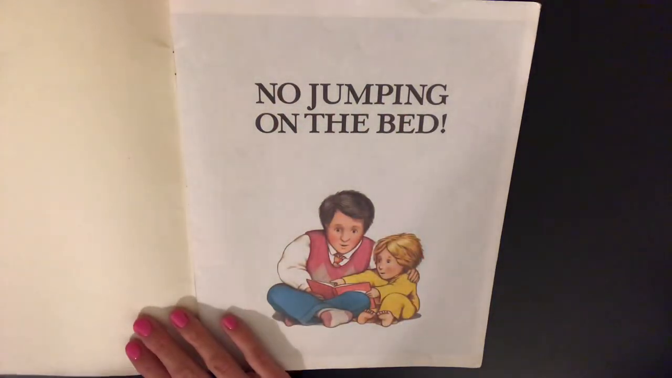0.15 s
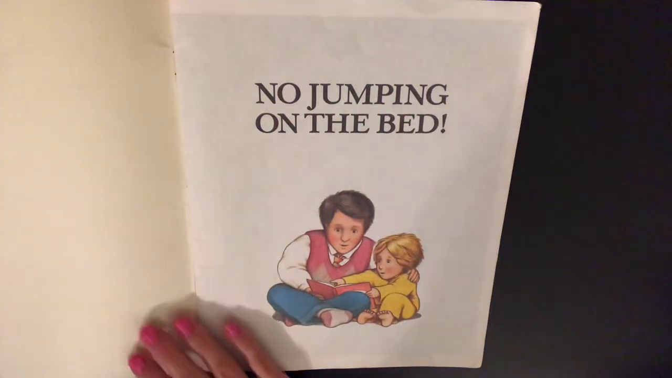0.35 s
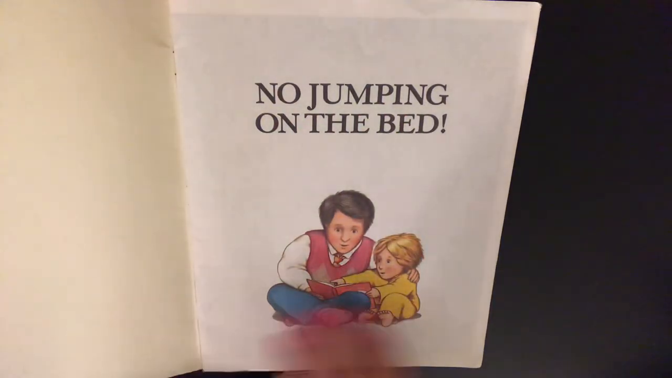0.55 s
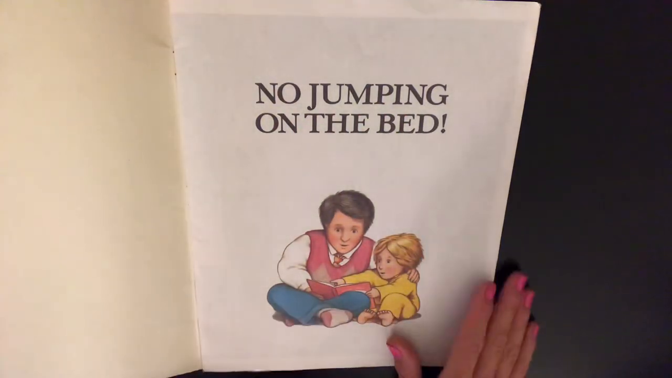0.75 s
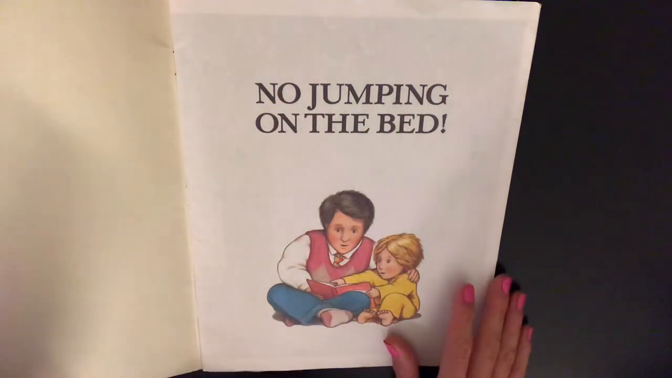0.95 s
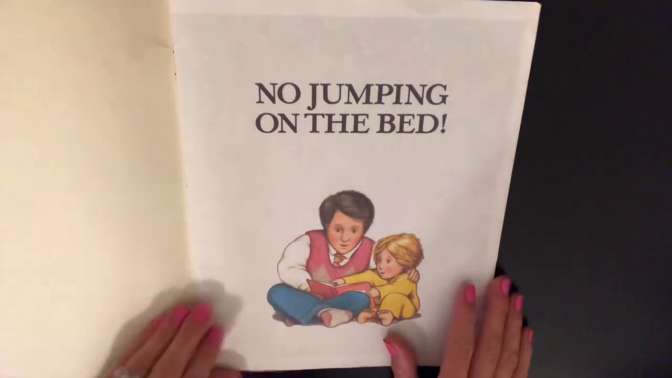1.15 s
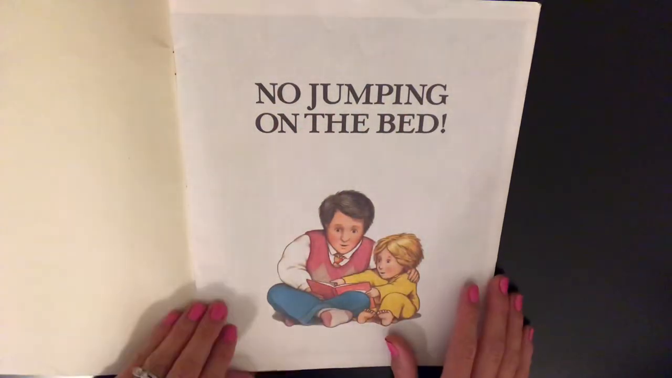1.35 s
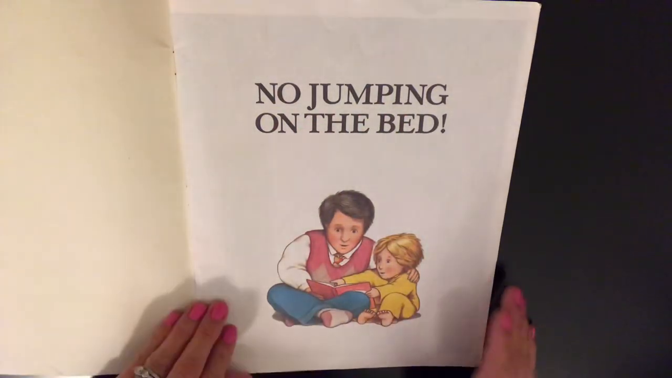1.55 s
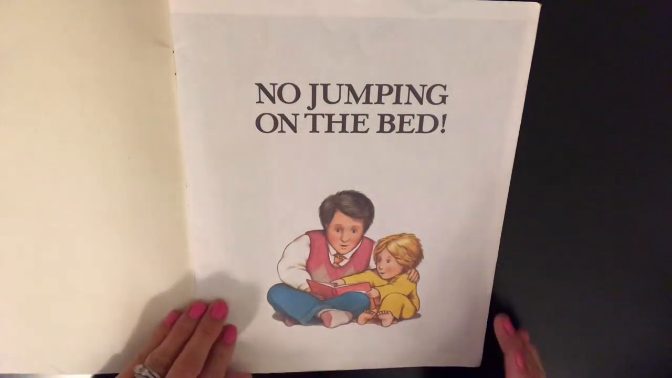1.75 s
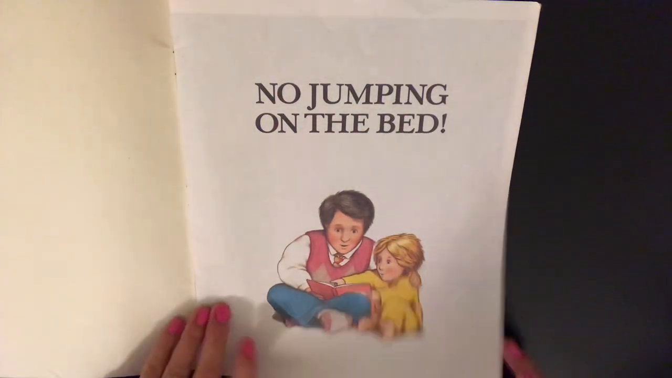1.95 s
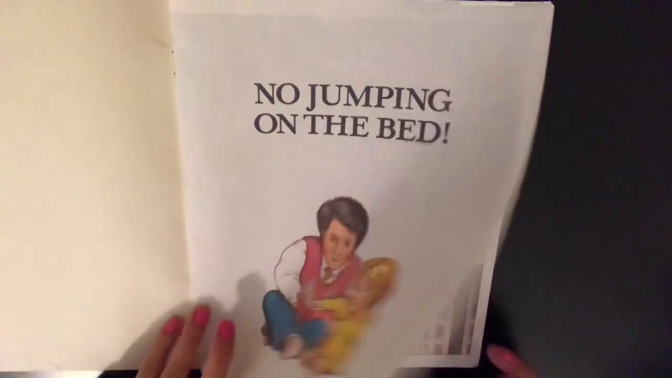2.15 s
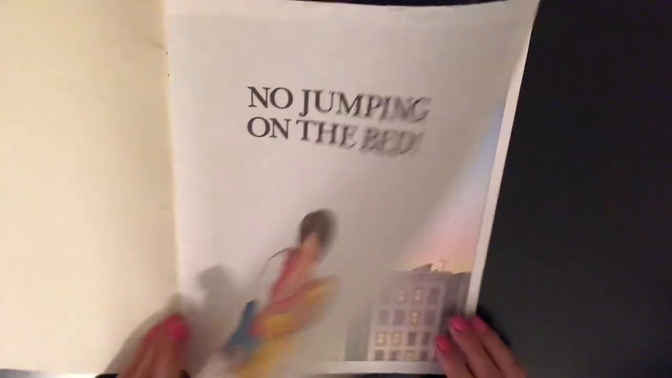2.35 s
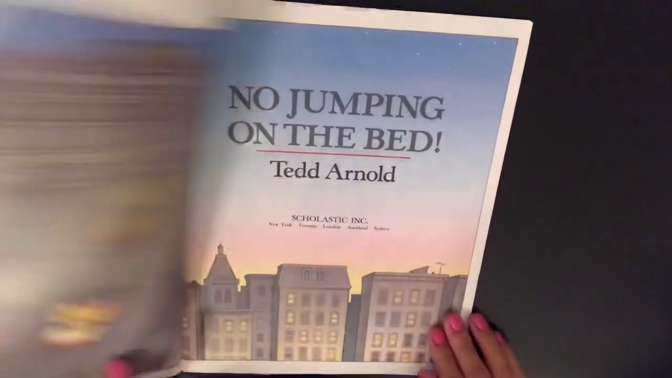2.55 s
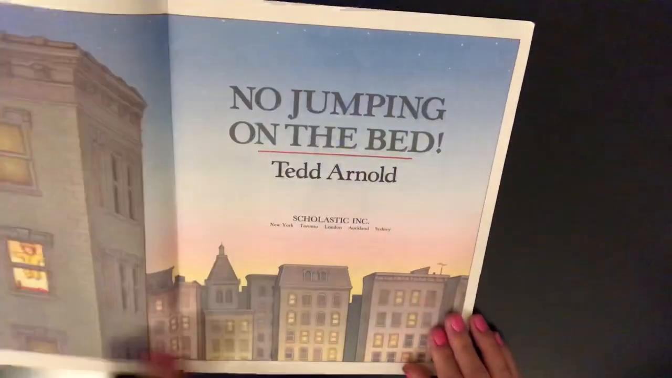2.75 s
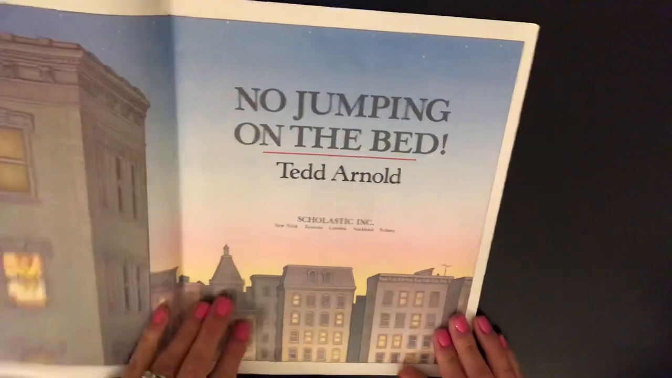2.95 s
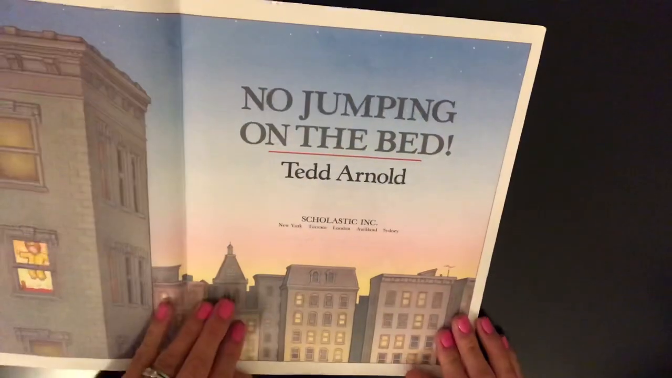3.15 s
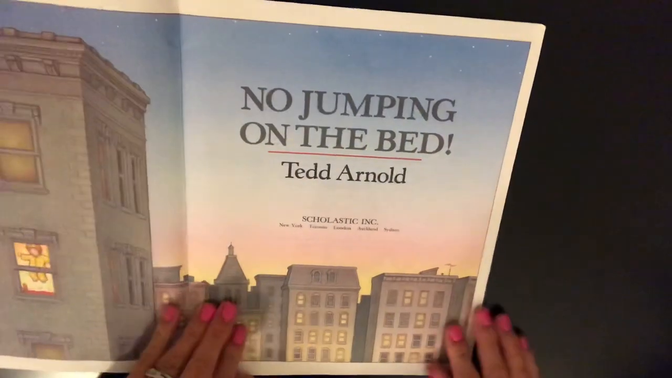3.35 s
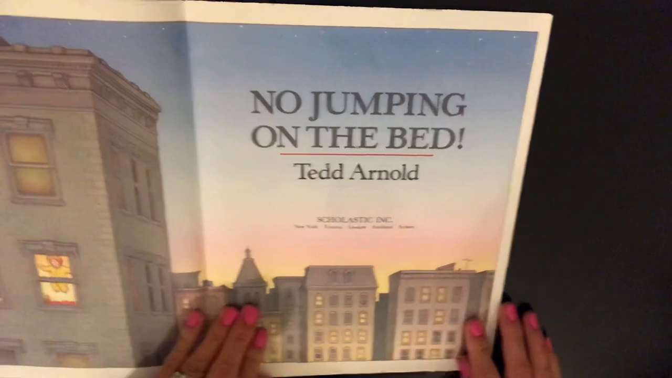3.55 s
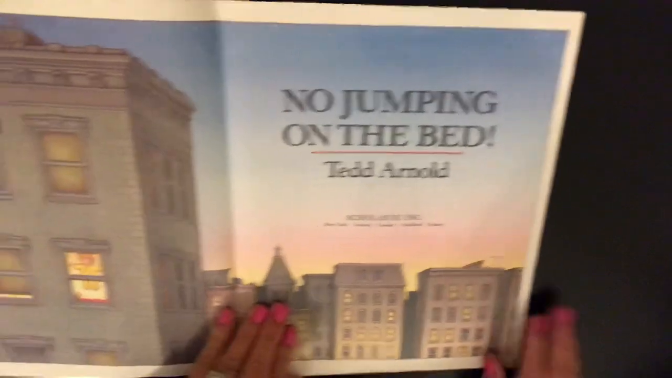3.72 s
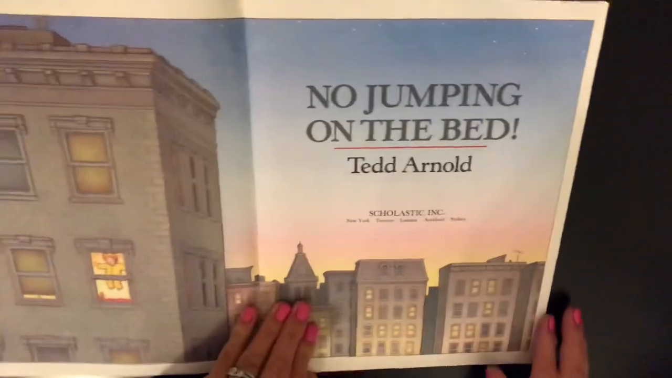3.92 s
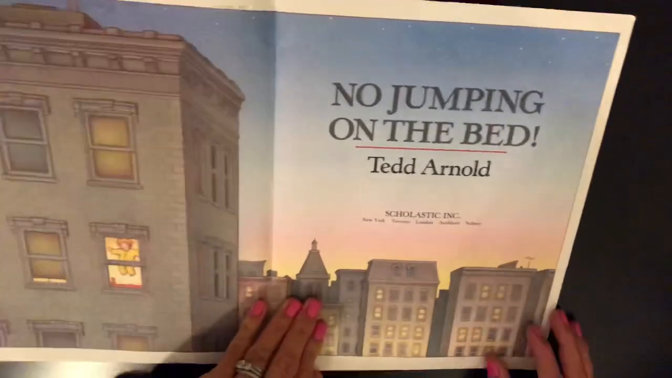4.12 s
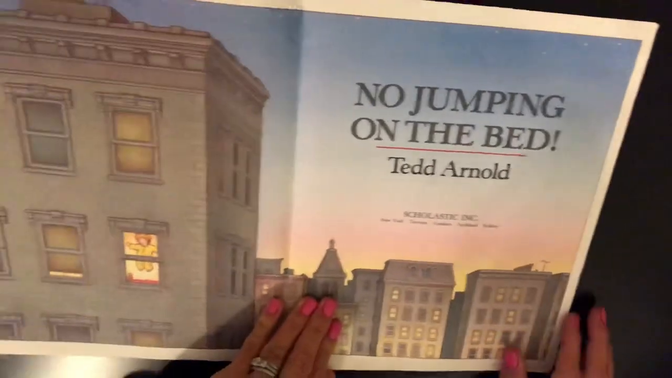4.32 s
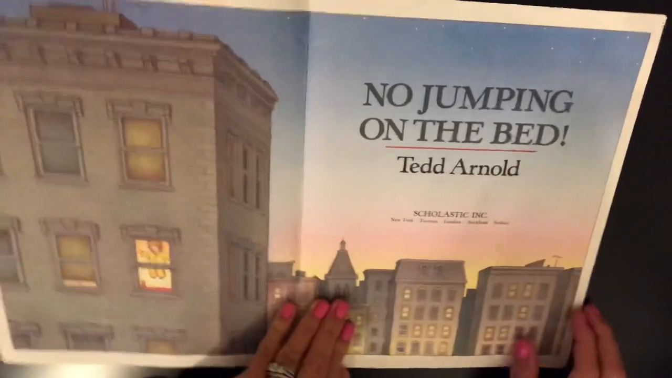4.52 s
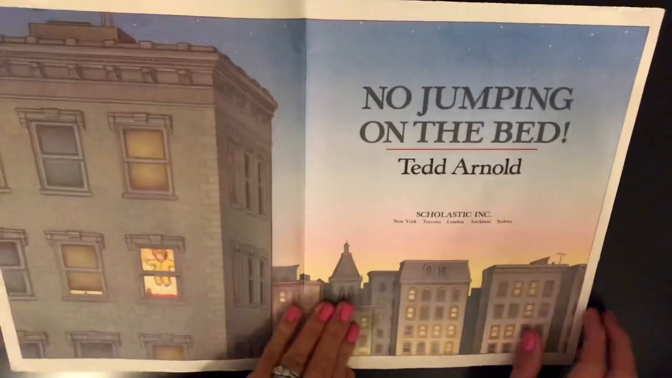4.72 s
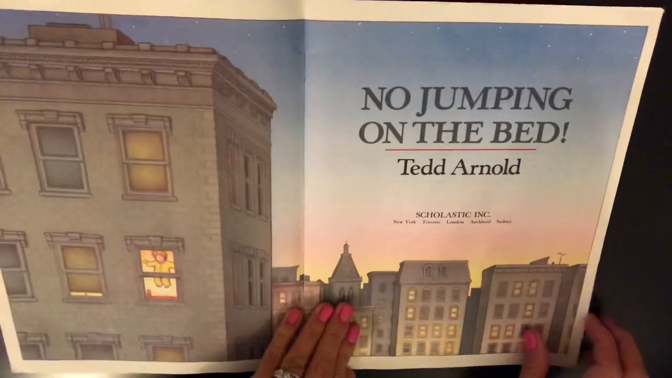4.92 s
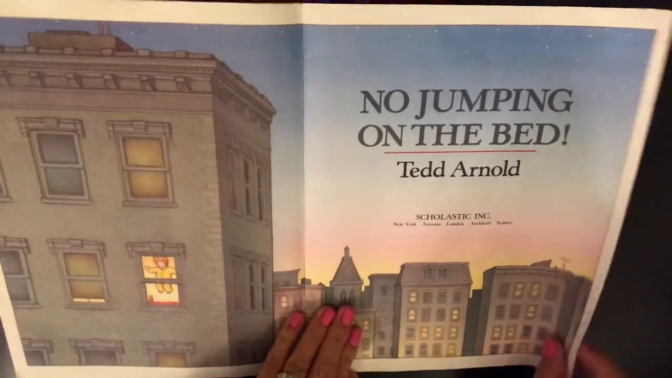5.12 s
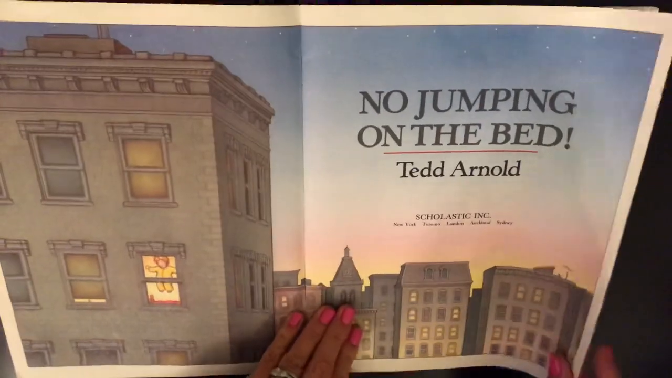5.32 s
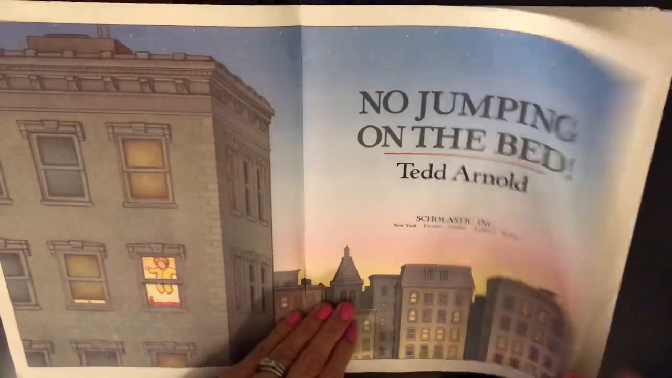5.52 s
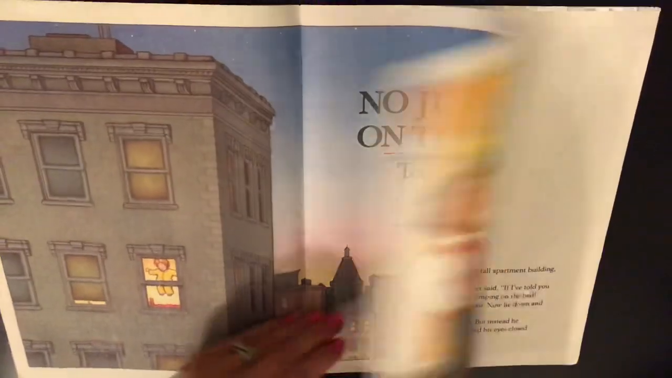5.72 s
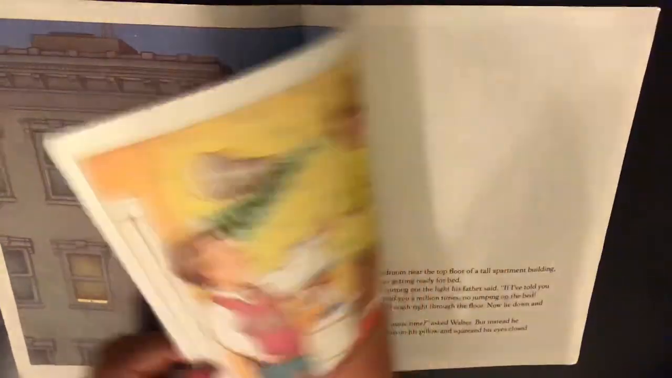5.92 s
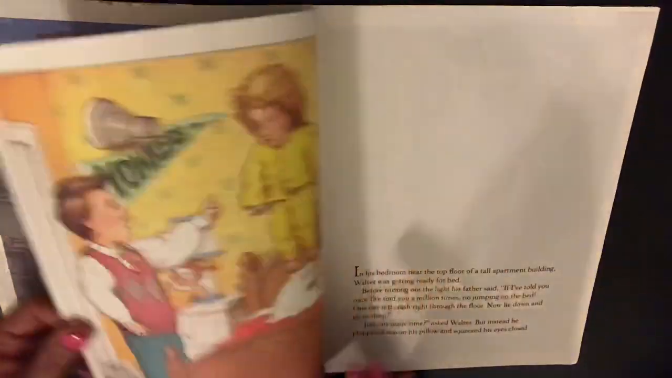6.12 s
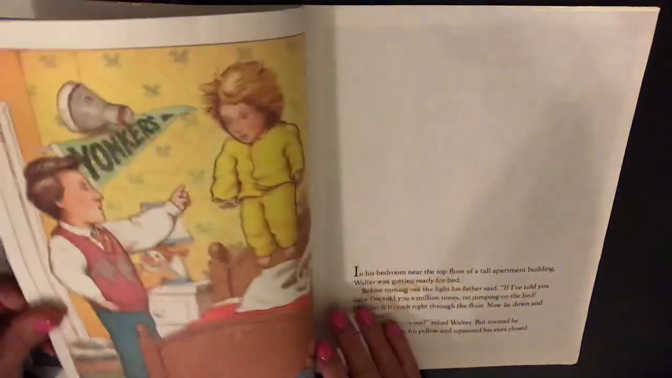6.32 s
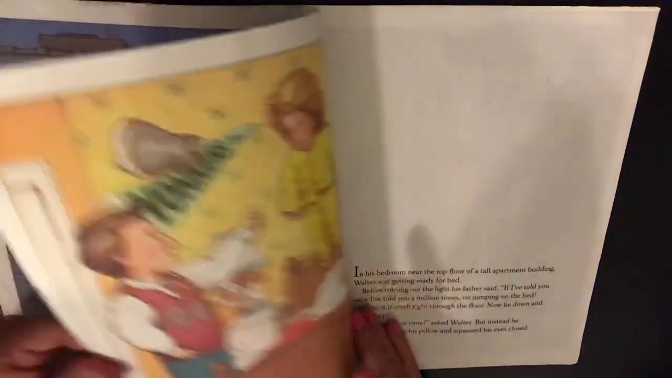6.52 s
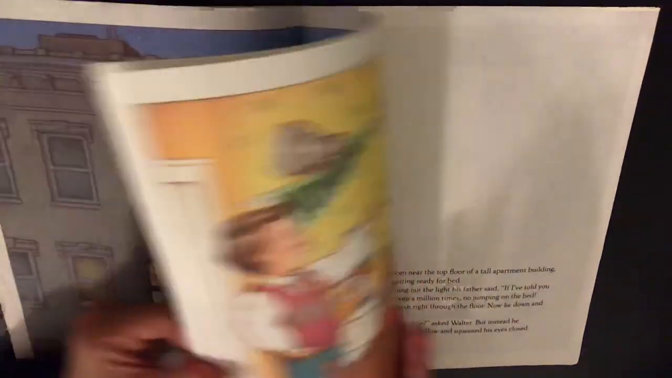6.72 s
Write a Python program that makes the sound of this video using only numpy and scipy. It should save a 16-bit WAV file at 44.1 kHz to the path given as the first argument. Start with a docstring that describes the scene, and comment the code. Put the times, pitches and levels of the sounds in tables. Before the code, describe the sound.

Fingertips brush a picture book's page, a hand bumps the table softly, then two large paper pages turn with rustles, snaps and one sharp crack.

```python
"""A low room hum comes first; fingertips brush over paper, then two pages of a big picture book are turned.
The hum is wavering sine tones over shaped noise, and a hand bumping the table is short booms with a rumble.
Stroking, scraping and gliding paper is made of many tiny random slips, shaped by how the movement goes.
The lifted sheet snaps and flaps as it buckles: short wavelets and bursts of slips. One sharp crack stands out.
"""
import sys
import numpy as np
from scipy import signal
from scipy.fft import rfft, irfft, next_fast_len
from scipy.io import wavfile
from scipy.ndimage import uniform_filter1d, map_coordinates

SR = 44100
rng = np.random.default_rng(int(sys.argv[2]) if len(sys.argv) > 2 else 0)


def put_to_file(sound):
    """Save the sound as 16-bit audio at rate SR, in the file named by the first command-line argument."""
    columns = np.atleast_2d(sound).T  # one column per channel
    safe = np.clip(columns, -1, 1)
    whole_steps = np.round(safe * 32767)
    wavfile.write(sys.argv[1], SR, whole_steps.astype(np.int16))


N = 302967  # length in samples, about 6.9 s

# In the event tables, t is the start, and level is set before the event's own envelope.
# The room's steady hum tones: [f/Hz, level/dB]
HUM_TONES = [(76.2, -59), (113.5, -62.5)]
# Colour of the room noise: [f/Hz, level per Hz/dB]
ROOM_COLOUR = [(20, -55), (29, -21), (42, -5.5), (62, -3), (85, -2.5), (110, -4.5), (170, -9.5),
               (300, -9.5), (430, -14), (600, -22.5), (1500, -27.5), (4000, -35), (9000, -42),
               (15800, -42.5)]
# How long the room's echo takes to fall by 60 dB: [f/Hz, decay/s]
ECHO_DECAY = [(200, 0.61), (2000, 0.24), (10000, 0.28)]
# The hand bumps the table top and sets it ringing: [t/s, level/dB, f/Hz, length/s]
TABLE_BUMPS = [(0.683, -35, 110, 0.037), (0.727, -34.5, 92, 0.035), (0.729, -48, 242, .013),
               (0.726, -51.5, 677, 0.039), (0.782, -36, 82.3, 0.046), (0.862, -44, 83.6, 0.083)]
# Fingertips brush lightly across the page, one movement: [t/s, length/s, level/dB]
FINGER_SWISH = (0.037, 0.69, -62.5)
# Colour of that brushing: [f/Hz, level per Hz/dB]
SWISH_COLOUR = [(530, -43), (900, -13), (1080, -12), (1460, -1.5), (1860, -5), (2060, -10), (3450, 0.5),
                (4190, -8), (5160, -12), (6200, -5), (7440, -9), (8450, -21), (9260, -14), (10400, -17),
                (14000, -22)]
# Fingernails and paper corners tick: [t/s, level/dB]
PAPER_TICKS = [(0.0853, -38.5), (1.258, -55), (1.495, -54), (1.639, -48.5), (1.944, -48), (1.9635, -43),
               (2.626, -37), (2.9037, -55), (3.2637, -41.5), (3.334, -46.5), (3.416, -44.5),
               (6.8555, -37.5)]
# The hand strokes the page, speeding up and slowing down: [t/s, length/s, level/dB, edge hiss/dB re level]
HAND_STROKES = [(3.237, 0.6, -55, -12), (3.557, .32, -48.5, -11.5), (3.83, 0.23, -63, -17),
                (3.942, .2, -55.5, -9), (4.119, .32, -55, -13.5), (4.405, .24, -55.5, -9),
                (4.906, 0.51, -61.5, -16), (6.01, 0.42, -61, -19), (6.474, 0.21, -61, -14),
                (6.725, 0.14, -56.5, -14)]
# The turning sheet glides over its neighbour: [t/s, length/s, level/dB, edge hiss/dB re level]
PAGE_GLIDES = [(1.947, 0.26, -56.5, -13), (2.15, 0.28, -52.5, -9), (2.35, 0.31, -59, -4.5),
               (2.519, 0.096, -52, -19), (5.283, 0.092, -41.5, -3.5), (5.302, .36, -47.5, -23),
               (5.609, 0.29, -48.5, -10), (5.856, 0.17, -54, -9), (6.56, 0.23, -46.5, -13)]
# A hand or a sheet lands and slides to rest: [t/s, level/dB, fade/s, edge hiss/dB re level]
SOFT_LANDINGS = [(0.675, -62.5, .07, -5), (0.858, -63.5, 0.021, -4), (0.965, -68, 0.032, -5),
                 (1.115, -61, 0.15, -7), (1.24, -64.5, 0.13, -13), (1.81, -68.5, 0.23, -5),
                 (2.77, -53, 0.1, -6.5), (2.905, -55.5, 0.065, -8), (2.985, -55.5, 0.028, -18),
                 (4.788, -63.5, .05, -9)]
# Colours of rubbing, in the sheet, at the contact and at the edge: each [f/Hz, level per Hz/dB]
DRONE_COLOUR = [(300, -40), (750, -10), (1100, -2.5), (1430, 3.5), (1800, 1.5), (2100, -7), (2600, -7.5),
                (4000, -33), (8000, -34)]
FRICTION_COLOUR = [(900, -33), (1800, -5), (2450, 2.5), (3000, 0), (3700, 1.5), (5000, -2), (6500, -2.5),
                   (8000, -13.5), (10500, -21), (15800, -21)]
HISS_COLOUR = [(2500, -31), (5500, 6.5), (8000, 3.5), (9300, 4), (10400, -3), (11600, 2), (13500, -4),
               (15800, -8)]
# The rubbing catches and chatters at a rough starting pitch: [t/s, length/s, level/dB, f/Hz]
RUB_CHATTERS = [(2.112, 0.0096, -34.5, 1550), (3.63, 0.03, -44, 1330), (3.75, 0.015, -37.5, 1450),
                (5.429, .012, -38, 1540), (6.643, .018, -39, 5600), (6.724, 0.047, -34, 5350)]
# Quick scrapes of a page edge: [t/s, length/s, level/dB, f/Hz, hiss/dB re level]
EDGE_SCRAPES = [(0.664, .067, -69, 4900, 7.5), (1.114, .075, -69.5, 3800, 4),
                (1.938, 0.019, -51, 3400, -18), (2.021, 0.052, -51, 4100, -5),
                (2.077, 0.025, -41.5, 2850, -7), (2.197, 0.043, -43, 4740, -4),
                (2.247, 0.0064, -38, 3780, -12), (2.528, 0.019, -40.5, 4900, -8.5),
                (2.615, 0.014, -42, 3460, -10), (2.657, 0.081, -47.5, 3450, -6.5),
                (2.731, .04, -40.5, 3600, -3.5), (2.901, .016, -51.5, 4170, -10),
                (3.265, .075, -62, 5000, -4), (5.028, 0.065, -51, 4240, -5.5),
                (5.109, 0.035, -58, 5000, -0.5), (5.153, 0.044, -47.5, 3630, -9.5),
                (5.302, .052, -41, 3870, -6), (5.35, 0.089, -36.5, 3360, -22),
                (5.442, 0.069, -40.5, 3280, -16), (5.914, 0.051, -50, 3680, -9),
                (6.017, 0.027, -51, 3500, -13), (6.255, 0.025, -58.5, 5640, -17),
                (6.352, 0.0066, -54, 4600, -24), (6.583, 0.078, -43.5, 5100, -5.5),
                (6.722, 0.044, -35.5, 4700, -10.5)]
# Flurries of buckles as the sheet bends or lands; the low first row, at 0.724 s, is instead a dull knock of the
# hand against the table edge, and the low row at 2.09 s is the push of air under the lifted sheet: [t/s,
# length/s, level/dB, f/Hz]
SHEET_FLAPS = [(0.724, 0.035, -48, 284), (0.725, 0.016, -46.5, 786), (1.954, 0.015, -43.5, 1360),
               (2.09, .07, -51.5, 210), (2.093, 0.036, -40, 1300), (2.13, 0.028, -37.5, 1080),
               (2.251, 0.018, -40, 1140), (2.275, 0.027, -40, 1050), (2.631, 0.017, -31, 1230),
               (2.649, .029, -27.5, 1240), (2.683, 0.127, -46, 1010), (2.761, 0.019, -36.5, 1280),
               (2.92, 0.098, -55.5, 1140), (5.358, .065, -49, 1530), (5.501, .007, -47, 1310),
               (5.821, 0.02, -37, 1100), (5.921, 0.042, -42.5, 1010), (5.959, 0.017, -41, 850),
               (6.007, 0.015, -43.5, 1020), (6.023, 0.029, -44.5, 770), (6.378, 0.042, -42.5, 710),
               (6.415, 0.011, -28.5, 1300), (6.426, 0.036, -34, 740), (6.467, 0.19, -56.5, 580),
               (6.554, 0.0095, -39, 1040), (6.600, 0.086, -48, 730), (6.724, 0.054, -45, 755),
               (6.855, .02, -40, 800)]
# Colours that move with an event's pitch: each [f/(event's f), level per Hz/dB]
CHATTER_COLOUR = [(.4, -40), (.7, -22), (.9, -3.5), (1, -1), (1.1, -1.5), (1.4, -15), (2.5, -44)]
SCRAPE_COLOUR = [(.08, -36), (.2, -20), (.35, -7.5), (.7, -3.5), (1, -1.5), (1.4, -6), (2, -15),
                 (3.5, -30.5)]
FLAP_COLOUR = [(.05, -10), (.2, -11), (.45, -7), (.75, -0.5), (1.1, 1), (1.7, -7), (2.8, -13.5),
               (4.5, -31.5), (7, -62), (14, -68)]
# Single buckles of the sheet: [t/s, level/dB, f/Hz, swell/cycles, crease click/dB re level]
SHEET_SNAPS = [(0.085, -32.5, 6000, 0.36, -8), (0.285, -43, 1620, 0.78, -8),
               (0.724, -36.5, 1990, 0.44, 3.5), (1.119, -41, 1520, .5, -11), (1.639, -41.5, 1540, 0.98, 2),
               (1.914, -41, 1290, 0.35, -7), (1.951, -25.5, 1420, 0.72, -13), (1.955, -25, 1480, 0.3, -17),
               (1.9635, -39.5, 3160, 0.34, 1), (2.117, -23, 1460, 0.41, -13),
               (2.251, -24.5, 3670, 0.42, -10), (2.626, -27, 2400, 0.29, -8), (2.632, -25, 1300, .32, -16),
               (2.6523, -23.5, 1490, 0.32, 8.5), (2.767, -25.5, 1240, 0.64, -12),
               (2.9037, -40, 1180, 0.57, 5), (2.9184, -33, 1100, 0.98, 10), (3.2637, -19, 1590, 0.84, -4.5),
               (5.5581, -28.5, 2750, 0.92, -10), (5.638, -31, 1650, 0.37, -3),
               (5.7982, -18, 1270, .53, -30), (5.822, -23, 1430, 0.25, -5), (6.015, -32, 1276, 0.96, -22),
               (6.3746, -28.5, 1060, 0.22, -0.5), (6.416, -25.5, 1650, 0.6, -6),
               (6.4222, -21, 1180, 0.24, -12), (6.728, -17, 4640, 0.78, -7),
               (6.8554, -15.5, 1150, 0.27, -7)]
# The sharp crack of the page popping through, one event: [t/s, level/dB, f/Hz]
PAGE_CRACK = (5.3551, -1.4, 3180)

TOP_HZ = 15900  # nothing is heard from here up
ARCH_END_DB, ARCH_FLATNESS = -19, 2.88  # a movement's level at its two ends; how long it stays near full
RUB_PATCH_DB, SWISH_PATCH_DB = 2.2, 3.5  # how strongly the colour shifts as the contact travels
SWISH_SAG_OCTAVES_PER_S, CHATTER_SAG_OCTAVES_PER_S = 0.3, 7  # how fast the pitch sinks
STROKE_DRONE_DB, GLIDE_DRONE_DB, LANDING_DRONE_DB = -0.5, -6, -0.5  # drone in the sheet, against friction
LANDING_RISE_S = 0.0036
TREMBLE_DB, TREMBLE_PER_S = 1.0, 50  # unsteady pressure: depth and random points a second
SNAP_DB = -25.5  # an ordinary buckle
SHIVER_DB, SHIVER_SLOPE = -12, 0.31  # its shiver against the flip; harder buckles are cleaner (dB per dB)


def amp(db):
    """Turn decibels into a gain."""
    return 10 ** (np.asarray(db) / 20)


def unit(x):
    """Scale x to rms 1."""
    return x / np.sqrt(np.mean(x ** 2) + 1e-20)


def along(points, hz):
    """Read a table of (frequency, value) points on a log frequency axis."""
    f, values = np.transpose(points)
    return np.interp(np.log(hz + 1e-9), np.log(f), values)


def clock(length):
    """Sample times of a stretch of sound, in seconds."""
    return np.arange(int(length * SR)) / SR


def add(track, s, sound):
    """Mix a sound into the track from time s on, cut at the track's end."""
    part = track[max(round(s * SR), 0):][:len(sound)]
    part += sound[:len(part)]


def filtered(x, response):
    """Filter x with a gain given as a function of frequency in Hz."""
    size = next_fast_len(len(x) + 4096)
    hz = np.fft.rfftfreq(size, 1 / SR)
    return irfft(rfft(x, size) * response(hz), size)[:len(x)]


def coloured(x, spectrum, pitch=1):
    """Shape x with a colour table, moved up by pitch, and scale it to rms 1."""
    return unit(filtered(x, lambda hz: amp(along(spectrum, hz / pitch))))


def wobble(rate):
    """A smooth curve through rate random points a second."""
    points = rng.standard_normal(4096)
    return map_coordinates(points, [np.arange(N) * rate / SR], mode="wrap")


def slips(size, rate, smooth):
    """Paper sticks and slips: tiny random kicks, rate a second, plus a share of smooth noise."""
    kicks = rng.standard_normal(size) * (rng.random(size) < rate / SR)
    return unit(kicks) + smooth * rng.standard_normal(size)


def gate(t, length, rise, fall):
    """An envelope that swells, holds until length and dies away."""
    swell = 1 - np.exp(-t / rise)
    return swell * np.exp(-np.maximum(t - length, 0) / fall)


def arch(s, length):
    """Loudness of one movement that gathers speed and slows to a stop."""
    t = np.arange(N) / SR
    from_middle = np.minimum(np.abs(2 * (t - s) / length - 1), 2)  # 0 in the middle, 1 at either end
    return amp(ARCH_END_DB * from_middle ** ARCH_FLATNESS)


def buckle(t, hz, cycles):
    """A patch of paper flips: a short sine under a swell that peaks at 1 after twice the given cycles."""
    turns = np.maximum(t, 0) * hz
    u = turns / cycles / 2
    swell = (u * np.exp(1 - u)) ** 2
    return swell * np.sin(2 * np.pi * turns)


def patchy(x, depth_db):
    """Give x resonances that come and go, a few hundred Hz wide and some 70 ms long."""
    z = signal.stft(x, nperseg=512)[2]
    field = uniform_filter1d(rng.standard_normal(z.shape), size=4, axis=0)  # smooth over frequency
    field = uniform_filter1d(field, size=12, axis=1)  # smooth over time
    return unit(signal.istft(z * amp(depth_db * unit(field)), nperseg=512)[1][:len(x)])


def sinking(x, octaves):
    """Change the reading speed of x so that it lies the given octaves lower at each sample."""
    return map_coordinates(x, [np.cumsum(2.0 ** -octaves)], mode="wrap")


def background():
    """Quiet room noise with a low hum that wavers in level and phase."""
    t = np.arange(N) / SR
    hum = np.zeros(N)
    for hz, db in HUM_TONES:
        level = amp(db + 1.34 * wobble(28)) * np.sqrt(2)  # a sine's peak is sqrt(2) times its rms
        hum += level * np.sin(2 * np.pi * hz * t + 0.36 * wobble(11))
    return hum + amp(-58.0) * coloured(rng.standard_normal(N), ROOM_COLOUR)


def walls(x):
    """The small room answers with a short tail of fading noise; the low end lingers longest."""
    hz, t, z = signal.stft(rng.standard_normal(SR // 3), SR, nperseg=256)
    fade = amp(-60 * t / along(ECHO_DECAY, hz)[:, None])
    tail = signal.istft(z * fade, SR, nperseg=256)[1]
    late_tail = np.pad(tail, (SR // 250, 0))  # the answer starts 4 ms late
    return signal.fftconvolve(x, late_tail / np.linalg.norm(tail))[:N]


def table_echo(x):
    """The table mirrors the sheet; the gap between them gives each contact its own hollow colour."""
    delay = rng.uniform(0.0004, 0.0016)  # s
    return unit(filtered(x, lambda hz: 1 - 0.45 * np.exp(-2j * np.pi * hz * delay)))


def bumps():
    """A soft hand pushes the table top, which booms for a few cycles and rumbles on unevenly."""
    out, t = np.zeros(N), clock(1 / 3)
    for s, db, hz, length in TABLE_BUMPS:
        boom = gate(t, length, rise=0.25 * length, fall=0.17 * length) * np.sin(2 * np.pi * hz * t)
        noise = coloured(rng.standard_normal(len(t)), FLAP_COLOUR, hz)
        rumble = gate(t, length, rise=0.006, fall=0.025) * noise
        add(out, s, amp(db) * (boom + amp(-11.5) * rumble))
    return out


def swish():
    """Fingertips skim the page with a thin, hollow hiss whose bands drift and sink."""
    s, length, db = FINGER_SWISH
    hiss = patchy(coloured(slips(N, rate=3000, smooth=1.4), SWISH_COLOUR), SWISH_PATCH_DB)
    since_middle = np.arange(N) / SR - s - length / 2
    return amp(db) * arch(s, length) * sinking(hiss, SWISH_SAG_OCTAVES_PER_S * since_middle)


def ticks():
    """A hard, tiny contact gives one sharp click and a brief spit of treble."""
    out, t = np.zeros(N), clock(1 / 30)
    for s, db in PAPER_TICKS:
        click = buckle(t, hz=9500, cycles=0.27)
        spit = coloured(rng.standard_normal(len(t)), HISS_COLOUR) * np.exp(-t / 0.0015)
        add(out, s, amp(db) * (amp(1) * click + amp(-0.5) * spit))
    return out


def rubbing(movements, drone_db):
    """Paper rubbed by (loudness, hiss dB) movements: slips sound in the sheet, and the pressure trembles."""
    effort = np.linalg.norm([loudness for loudness, hiss_db in movements], axis=0)
    edge = np.linalg.norm([loudness * amp(hiss_db) for loudness, hiss_db in movements], axis=0)
    drone = patchy(coloured(slips(N, rate=700, smooth=1.0), DRONE_COLOUR), RUB_PATCH_DB)
    friction = patchy(coloured(slips(N, rate=1500, smooth=1.2), FRICTION_COLOUR), RUB_PATCH_DB)
    hiss = coloured(slips(N, rate=4000, smooth=0.98), HISS_COLOUR)
    pressure = amp(TREMBLE_DB * wobble(TREMBLE_PER_S))
    return pressure * (effort * (amp(drone_db) * drone + friction) + edge * hiss)


def sliding():
    """The hand's strokes drone in the sheet, a gliding page is brighter, and a landing starts at once and fades."""
    t = np.arange(N) / SR
    strokes = [(amp(db) * arch(s, length), hiss_db) for s, length, db, hiss_db in HAND_STROKES]
    glides = [(amp(db) * arch(s, length), hiss_db) for s, length, db, hiss_db in PAGE_GLIDES]
    landings = []
    for s, db, fade, hiss_db in SOFT_LANDINGS:
        since_contact = np.maximum(t - s, 0)
        landings.append((amp(db) * gate(since_contact, 0, LANDING_RISE_S, fade), hiss_db))
    stroked = rubbing(strokes, STROKE_DRONE_DB)
    glided = rubbing(glides, GLIDE_DRONE_DB)
    return stroked + glided + rubbing(landings, LANDING_DRONE_DB)


def chatters():
    """Slips fall nearly into step: a narrow band of noise that sinks in pitch as the slip slows."""
    out, t = np.zeros(N), clock(1 / 8)
    for s, length, db, hz in RUB_CHATTERS:
        band = coloured(rng.standard_normal(len(t)), CHATTER_COLOUR, hz)
        envelope = gate(t, length, rise=0.0021, fall=0.0033)
        add(out, s, amp(db) * envelope * sinking(band, CHATTER_SAG_OCTAVES_PER_S * t))
    return out


def scrapes():
    """The page edge drags briefly over its neighbour: dense, bright slips that swell as it gathers speed."""
    out, t = np.zeros(N), clock(1 / 5)
    for s, length, db, hz, hiss_db in EDGE_SCRAPES:
        rasp = coloured(slips(len(t), rate=3500, smooth=0.82), SCRAPE_COLOUR, hz)
        hiss = coloured(slips(len(t), rate=4500, smooth=0.76), HISS_COLOUR)
        speed = gate(t, length, rise=0.13 * length, fall=0.0041)
        add(out, s, amp(db) * speed * (table_echo(rasp) + amp(hiss_db) * hiss))
    return out


def flaps():
    """A bending sheet gives way in a run of dull buckles that fades as the tension goes."""
    out, t = np.zeros(N), clock(1 / 5)
    for s, length, db, hz in SHEET_FLAPS:
        tension = gate(t, length, rise=0.00075, fall=0.0083) * amp(1.5 - 6.4 * t / length)
        run = coloured(slips(len(t), rate=1800, smooth=0.77), FLAP_COLOUR, hz)
        add(out, s, amp(db) * tension * table_echo(run))
    return out


def snaps():
    """Each buckle rings a patch of the sheet, clicks at the crease and leaves the paper shivering."""
    out, t = np.zeros(N), clock(1 / 8)
    for s, db, hz, cycles, crease_db in SHEET_SNAPS:
        shiver_db = SHIVER_DB - SHIVER_SLOPE * (db - SNAP_DB)
        flip = buckle(t, hz, cycles)
        crease = buckle(t, hz=3230, cycles=0.33)
        noise = coloured(rng.standard_normal(len(t)), FLAP_COLOUR, hz)
        shiver = noise * gate(t, 0, rise=0.00033, fall=0.005)
        add(out, s, amp(db) * (flip + amp(crease_db) * crease + amp(shiver_db) * shiver))
    return out


def crack():
    """The taut page pops through and at once flips back the other way."""
    out, t = np.zeros(N), clock(1 / 20)
    s, db, hz = PAGE_CRACK
    flip = buckle(t, hz, cycles=0.26)
    back = buckle(t - 0.00156, hz, cycles=0.26)
    noise = coloured(rng.standard_normal(len(t)), HISS_COLOUR)
    tick = noise * gate(t, 0.0019, rise=0.0016, fall=0.00082)
    add(out, s, amp(db) * (flip - back + amp(-27) * tick))
    return out


def scene():
    """The book on the table, close up, with a little room."""
    touches = bumps() + swish() + ticks()
    rubs = sliding() + chatters() + scrapes()
    buckles = flaps() + snaps() + crack()
    book = touches + rubs + buckles
    return (background() + amp(-15.5) * walls(book) + book)[None]


def record(dry):
    """Cut away everything from the top frequency up."""
    return np.array([filtered(channel, lambda hz: hz < TOP_HZ) for channel in dry])


dry = scene()
out = record(dry)
put_to_file(out)
```